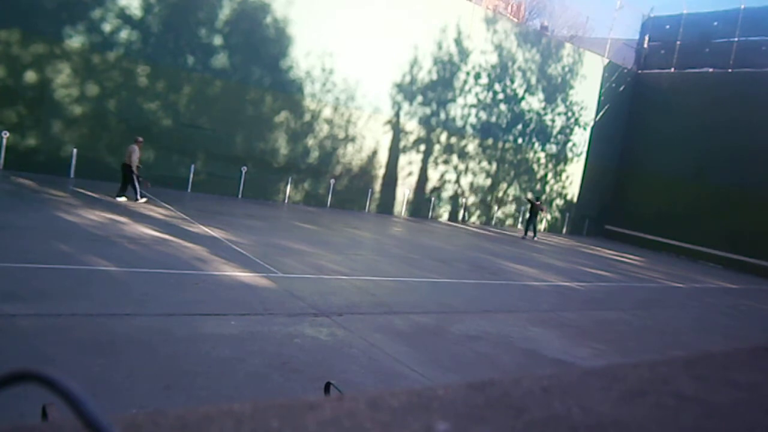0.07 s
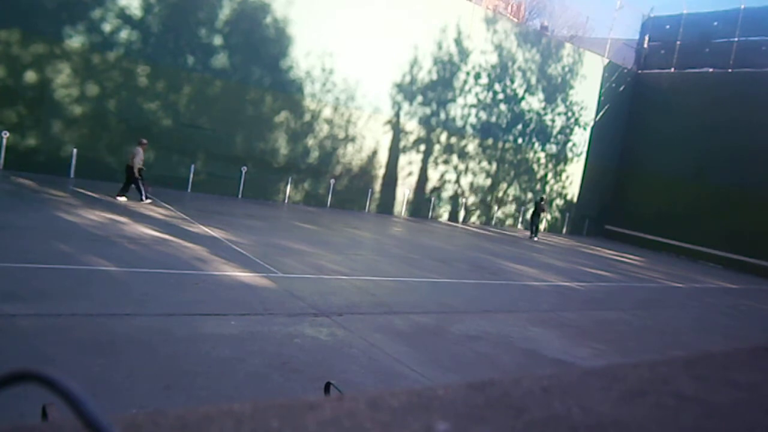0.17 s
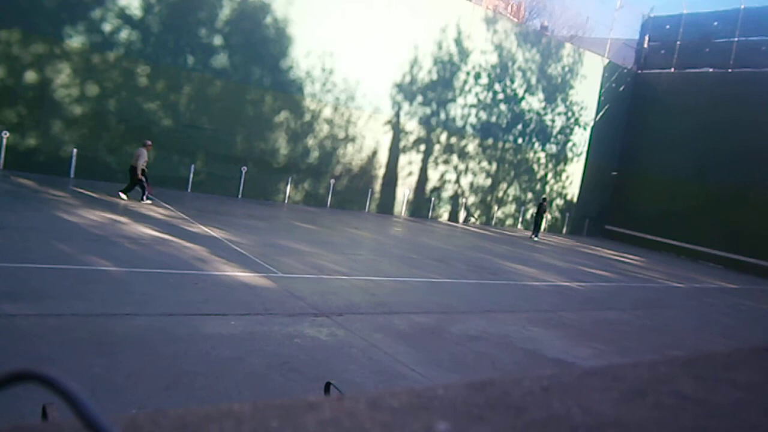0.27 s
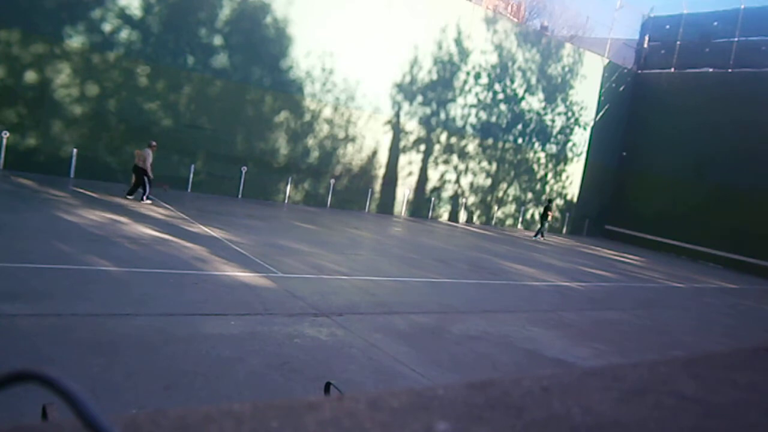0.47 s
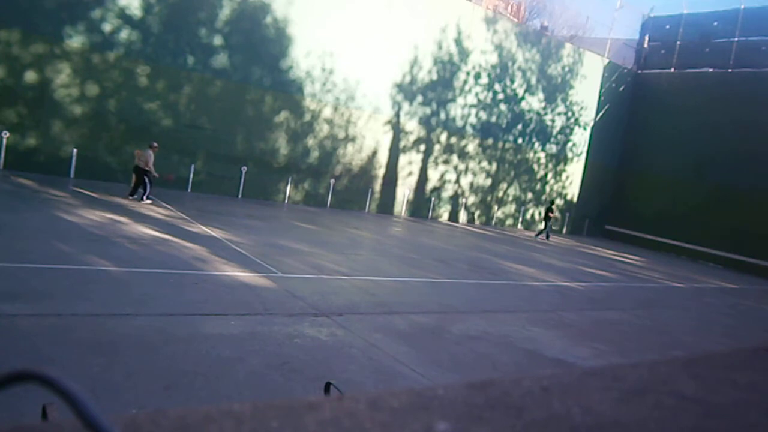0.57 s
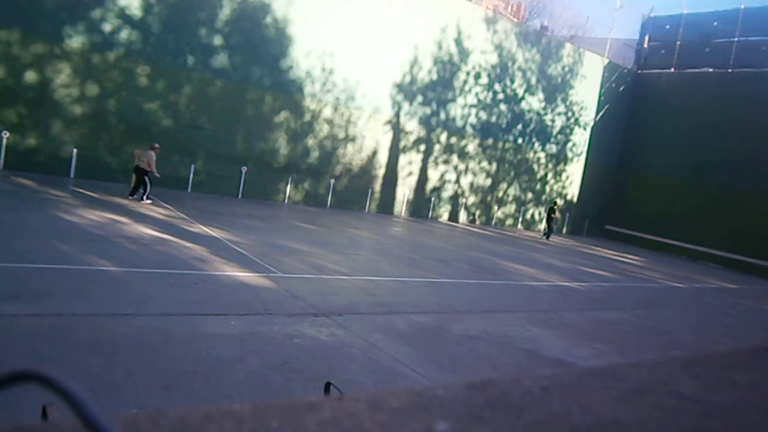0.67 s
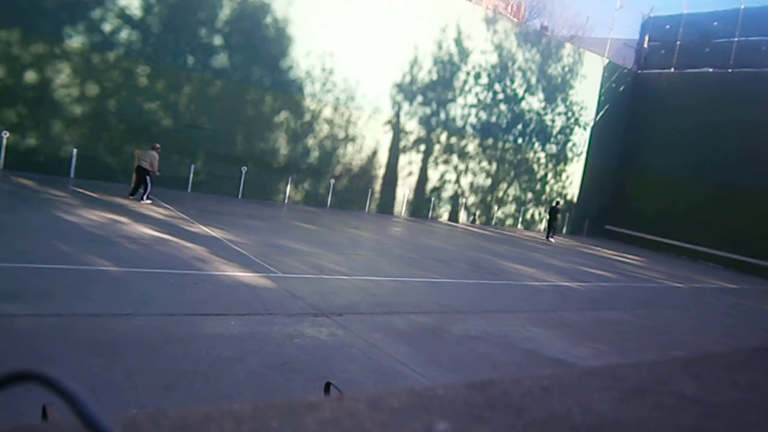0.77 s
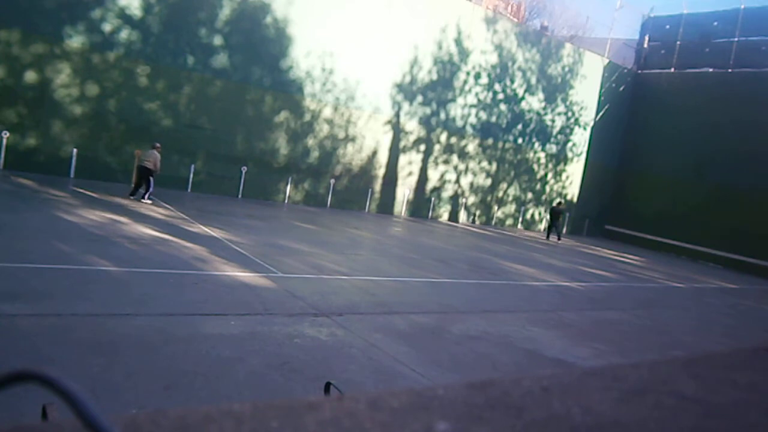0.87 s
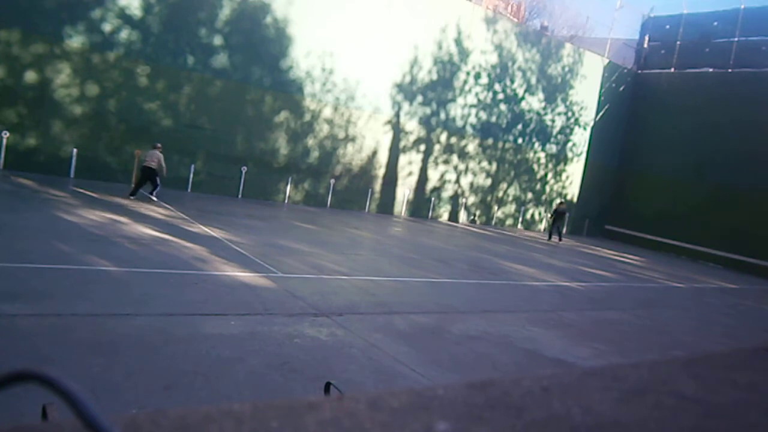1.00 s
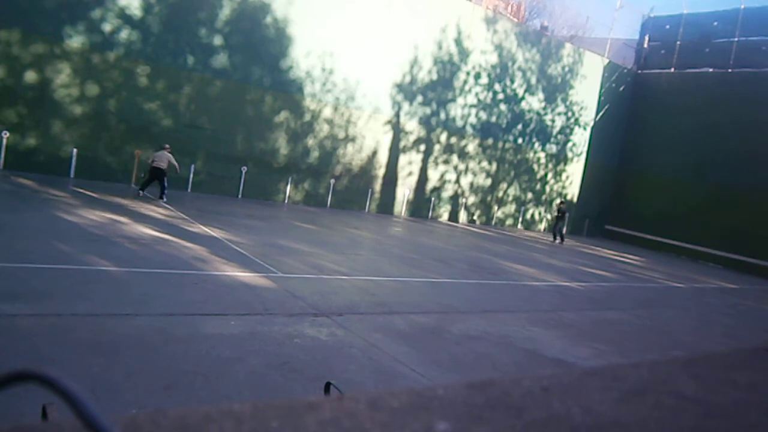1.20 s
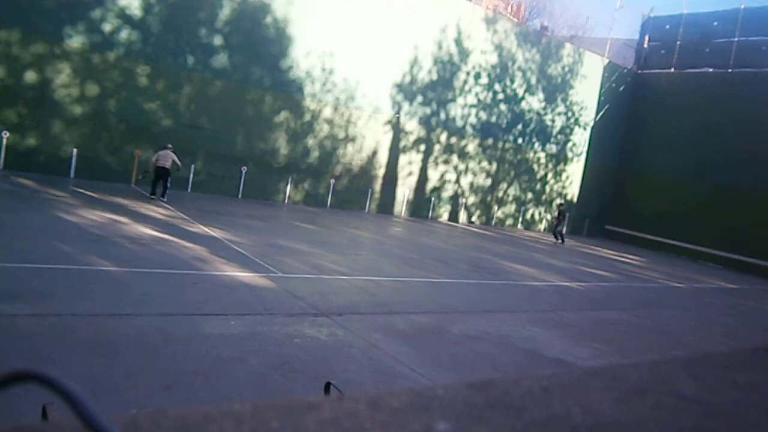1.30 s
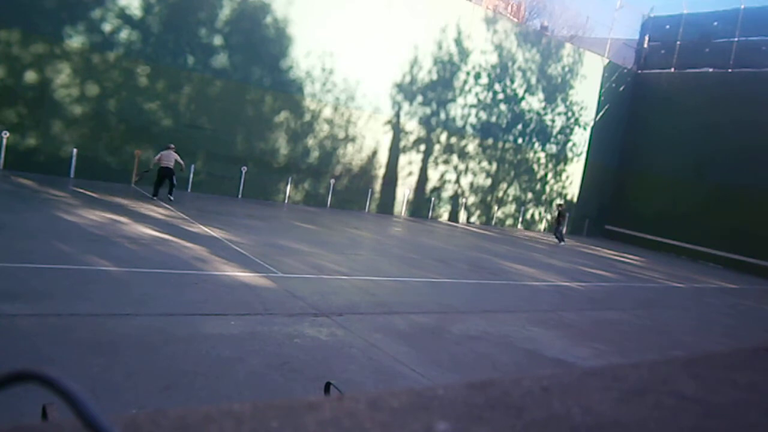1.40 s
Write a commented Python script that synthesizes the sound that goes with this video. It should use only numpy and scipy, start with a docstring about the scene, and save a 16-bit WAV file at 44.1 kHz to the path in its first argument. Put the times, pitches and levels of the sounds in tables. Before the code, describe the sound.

A ball is struck on a large outdoor court, giving two quick hollow pops at about 0.2 and 0.25 seconds, then a harder crack at 0.4 seconds. The hits sound dull and slightly overloaded, echoing off high concrete walls and fading over the next second. A shoe scuffs very faintly near 1.4 seconds. A low, steady distant noise runs throughout.

```python
"""A large outdoor court with high concrete walls, where a hollow ball is played.
Two quick hollow poks, the resonance of the air in the ball, are followed by a hard contact crack.
Each blow is reflected by the floor and the walls, then the court rings out in diffuse reverberation.
A shoe scuffs faintly at the end, distant noise runs throughout, and the blows overload and sound dull.
"""
import sys
import numpy as np
from scipy import signal
from scipy.fft import rfft, irfft
from scipy.io import wavfile

SR = 44100
rng = np.random.default_rng(int(sys.argv[2]) if len(sys.argv) > 2 else 0)


def output_pcm(signal):
    """Save a mono or channel-first signal as 16-bit PCM at the path in sys.argv[1].

    Samples are clipped to [-1, 1] before scaling.
    """
    pcm = np.clip(np.atleast_2d(signal).T, -1, 1) * 32767
    wavfile.write(sys.argv[1], SR, np.round(pcm).astype(np.int16))


N = 63945
T = np.arange(N) / SR

# Blows on the ball: t/s, cavity f/Hz, pok swell t/s, pok level/dB, crack level/dB, crack rise t/s,
# crack decay t/s, thud level/dB, relative reverberation level/dB
BALL_BLOWS = [(0.201, 907, .0044, 0.5, -7.5, 0.0022, 0.0062, -32, -34),
              (0.2507, 1130, 0.0029, -3, -4.5, 0.0016, 0.0027, -26, -40.5),
              (0.4343, 1034, 0.0042, -3, 2, 0.00065, 0.0035, -8, -28)]
# Spectrum of the sound returned by the court: f/Hz, relative level/dB
COURT_SPECTRUM = [(60, -40), (200, -16), (450, -7.5), (650, -13.5), (860, 3.5), (1000, -2.5), (1150, 1),
                  (1350, -13.5), (1750, -9), (2000, -17), (2250, -10.5), (3100, -11.5), (3650, -10),
                  (4050, -17.5)]


def impact(start, cavity_hz, swell_s, pok_db, crack_db, rise_s, crack_s, thud_db):
    """Impulse excitation: contact cracks, the air in the ball resonates (pok), and its shell thuds."""
    # Modes of the enclosed air: multiple of the cavity frequency, relative level/dB
    cavity_modes = [(1, 0.5), (.29, -19.5), (.55, -24), (1.38, -15)]
    # Spectrum of the contact noise: f/Hz, relative level/dB
    crack_spectrum = [(30, -3), (250, -8), (600, -4.5), (800, 11), (1300, 0.5), (1750, -0.5), (2050, -1.5),
                      (2800, 0), (3500, 4), (4200, -6.5)]
    # Modes of the flattened ball and the struck surface: f/Hz, relative level/dB, T60/s
    thud_modes = [(28, -12.5, 0.1), (70, -11.5, 0.049), (181, -7, 0.037), (354, -1.5, 0.043),
                  (514, -0.5, 0.042), (783, -7, 0.034), (1776, -2, 0.053)]
    pok_sharpness = 7.94
    t = since(start)
    u = t / swell_s
    envelope = (u * np.exp(1 - u)) ** pok_sharpness   # peaks at t = swell_s
    pok = envelope * sum(from_db(db) * np.sin(2 * np.pi * k * cavity_hz * t) for k, db in cavity_modes)
    crack = noise(crack_spectrum) * (1 - np.exp(-(t / rise_s) ** 2)) * np.exp(-t / crack_s)
    thud = sum((-1) ** k * from_db(db) * np.exp(-np.log(1000) * t / t60) * np.sin(2 * np.pi * hz * t)
               for k, (hz, db, t60) in enumerate(thud_modes))
    return from_db(pok_db) * pok + from_db(crack_db) * crack + from_db(thud_db) * thud


def ball():
    """Multipath propagation: each blow arrives directly, then off the floor and the near walls."""
    # Early reflections, one list for each blow: delay t/s, level/dB, reflected pok f/Hz
    reflections = [
        [(.0095, 0.5, 888.5), (.0176, -7.5, 1027)],
        [(.0059, 1.5, 1077), (.0106, -10.5, 1276), (.0158, -4, 1232), (.0200, -11, 1275)],
        [(.0064, -1, 1200), (.0123, -5.5, 1257), (.0166, -3.5, 865)],
    ]
    loss_db_per_s = 552   # later reflections lose more of the crack and thud than of the pok
    out = 0
    for blow, paths in zip(BALL_BLOWS, reflections):
        start, cavity_hz, swell_s, pok_db, crack_db, rise_s, crack_s, thud_db, _ = blow
        direct = (0.00044, 0.0073, cavity_hz)
        for delay, db, hz in [direct] + paths:
            loss = loss_db_per_s * delay
            arrival = impact(start + delay, hz, swell_s, pok_db, crack_db - loss,
                             rise_s, crack_s, thud_db - loss)
            out = out + from_db(db) * arrival
    return out


def far_walls():
    """Scattering: rough walls and trees smear the echoes into bursts of noise that add in power."""
    # Returns from the far walls: t/s, level/dB, spread t/s
    echoes = [(0.285, -28.5, 0.0058), (0.302, -27.5, .008), (0.333, -30, 0.0045), (.488, -23, 0.011),
              (0.5124, -18, 0.0044), (0.521, -15.5, 0.0054), (0.62, -26.5, 0.0069), (0.657, -26.5, 0.0028),
              (0.687, -25.5, 0.0042), (0.796, -28, .004), (.92, -35.5, 0.056), (1.17, -40, 0.011)]
    power = sum((from_db(db) * swell(arrival, spread)) ** 2 for arrival, db, spread in echoes)
    return noise(COURT_SPECTRUM) * np.sqrt(power)


def reverberation():
    """A diffuse field builds up after each blow and decays at its own rate in each band."""
    # Reverberation time of the court: f/Hz, T60/s
    decay_times = [(150, 1.7), (500, 1.45), (1000, 1.53), (2000, 1.45), (4000, 1.29)]
    predelay_s, build_s, early_share = 0.025, 0.25, 0.64
    decay_bend = 1.344   # above 1: the tail holds between the walls, then escapes faster
    spectrum = rfft(noise(COURT_SPECTRUM))
    hz = np.arange(len(spectrum)) * SR / N
    out = 0
    for centre, t60 in decay_times:
        band_gain = at_hz([(f, f == centre) for f, _ in decay_times], hz)
        power = 0
        for start, *_, db in BALL_BLOWS:
            t = since(start + predelay_s)
            build = 1 - (1 - early_share) * np.exp(-t / build_s)
            decay = np.exp(-np.log(1000) * (t / t60) ** decay_bend)
            power = power + ((t > 0) * from_db(db) * build * decay) ** 2
        out = out + irfft(spectrum * band_gain, N) * np.sqrt(power)
    return 2 * out


def shoe():
    """Sliding friction: a sole on the concrete gives one faint burst of noise."""
    # Spectrum of the scuff: f/Hz, relative level/dB
    scuff_spectrum = [(200, -28), (1200, -12), (2200, 2), (3500, -2), (4000, -11)]
    return from_db(-45.5) * noise(scuff_spectrum) * swell(centre_s=1.365, spread_s=0.014)


def background():
    """Stationary noise from far away, strongest in the bass."""
    # Spectrum of the distant noise: f/Hz, relative level/dB
    distant_spectrum = [(25, -0.5), (55, 2.5), (85, 9), (130, 1), (300, 0), (650, -1), (900, 0),
                        (1250, -0.5), (1700, -7), (2400, -10), (3100, -9), (3550, -5.5), (4050, -14.5)]
    return from_db(-39.5) * noise(distant_spectrum)


def from_db(db):
    """Amplitude ratio of a level in decibels."""
    return 10 ** (np.asarray(db) / 20)


def at_hz(points, hz):
    """Interpolation of a table on a log-frequency axis."""
    f, value = np.transpose(points)
    return np.interp(np.log(np.maximum(hz, 1)), np.log(f), value)


def noise(spectrum):
    """Random-phase noise of rms 1, rolling off above the last point of its spectrum."""
    hz = np.arange(N // 2 + 1) * SR / N
    gain = from_db(at_hz(spectrum, hz)) / np.sqrt(1 + (hz / spectrum[-1][0]) ** 20)
    x = irfft(gain * np.exp(2j * np.pi * rng.random(len(hz))), N)
    return x / x.std()


def since(start):
    """Seconds since an onset, zero before it."""
    return np.maximum(T - start, 0)


def swell(centre_s, spread_s):
    """A Gaussian envelope around a moment."""
    return np.exp(-.5 * ((T - centre_s) / spread_s) ** 2)


def scene():
    """Superposition of the ball, its echoes and the surroundings, in mono."""
    return (ball() + far_walls() + reverberation() + background() + shoe())[None]


def record(dry):
    """Saturation: the blows overload and sound dull, with a dip near 5 kHz and the top cut."""
    band_top_hz, overload, knee = 4127, 0.72, 4.9
    dip_hz, dip_q, dip_share, cutoff_hz = 5400, 2.1, 0.71, 16300
    x = signal.sosfilt(signal.butter(20, band_top_hz, fs=SR, output="sos"), dry)
    x = x / (1 + np.abs(x / overload) ** (2 * knee)) ** (.5 / knee)
    x = x - dip_share * signal.lfilter(*signal.iirpeak(dip_hz, dip_q, fs=SR), x)
    return signal.sosfilt(signal.ellip(10, .1, 80, cutoff_hz, fs=SR, output="sos"), x)


dry = scene()
out = record(dry)
output_pcm(out)
```